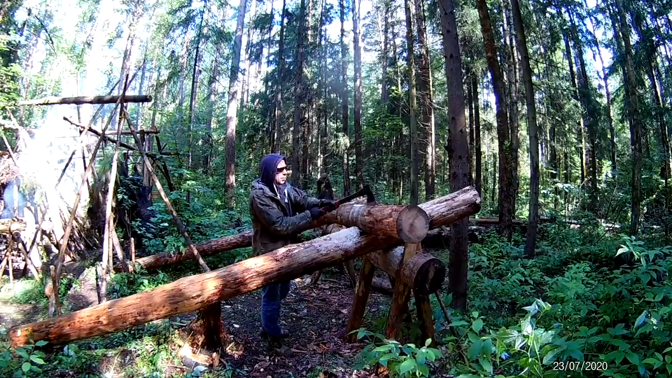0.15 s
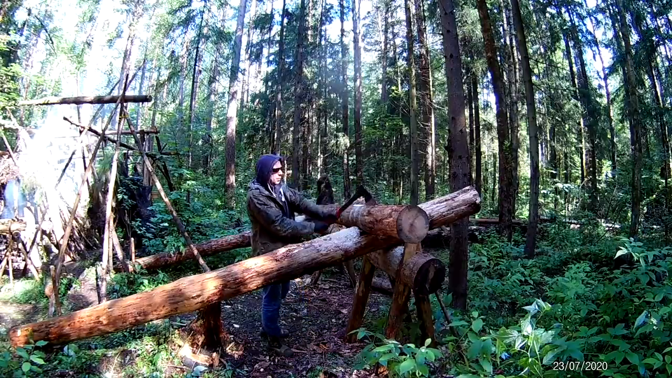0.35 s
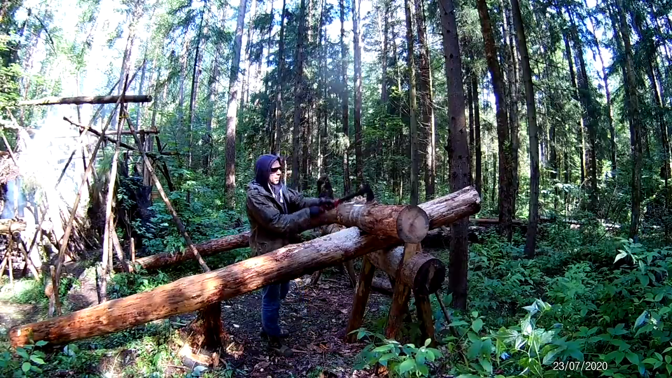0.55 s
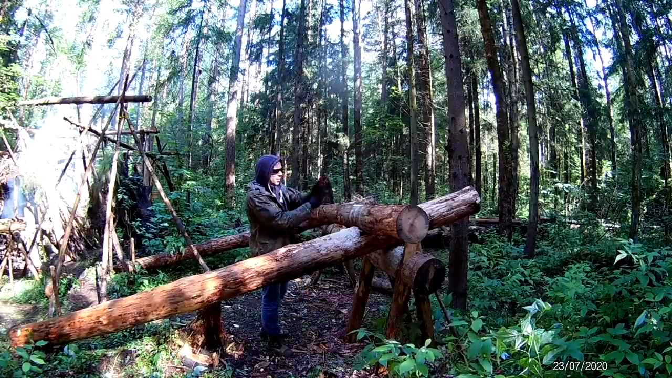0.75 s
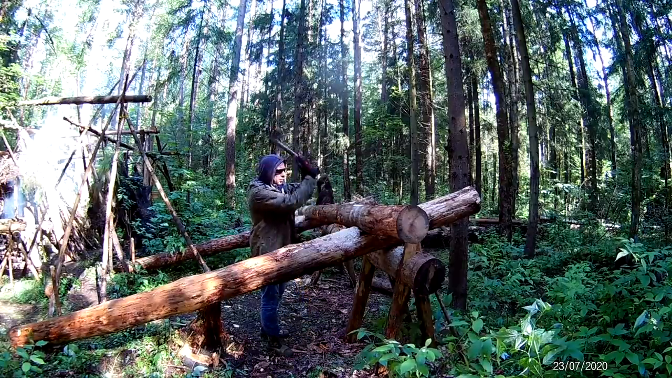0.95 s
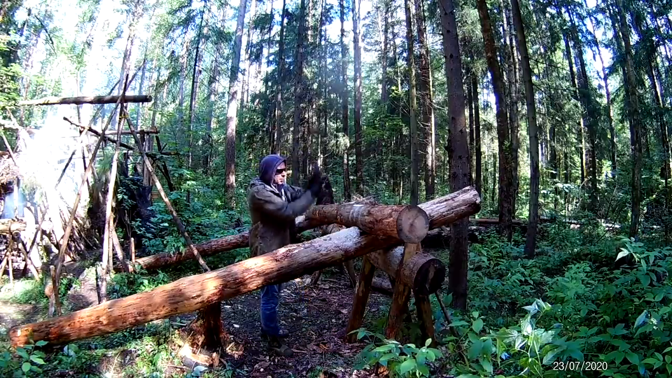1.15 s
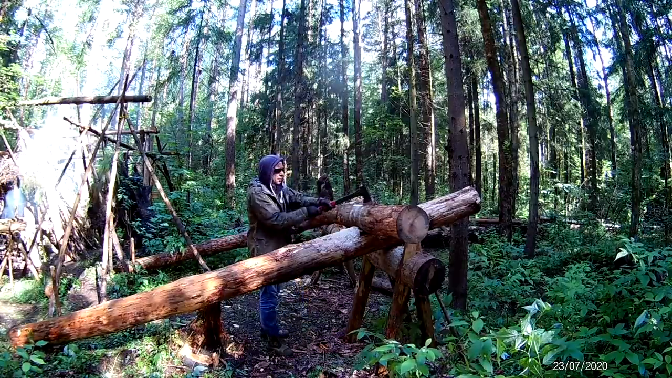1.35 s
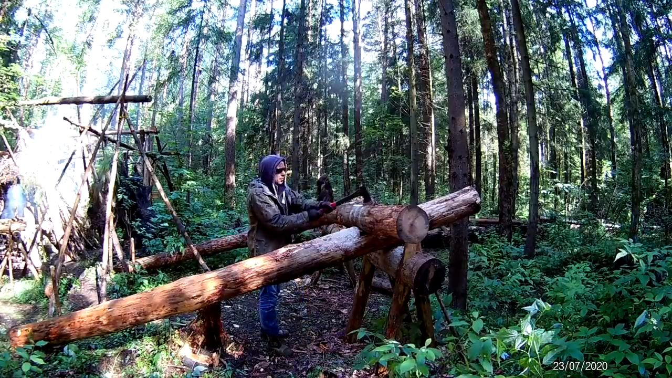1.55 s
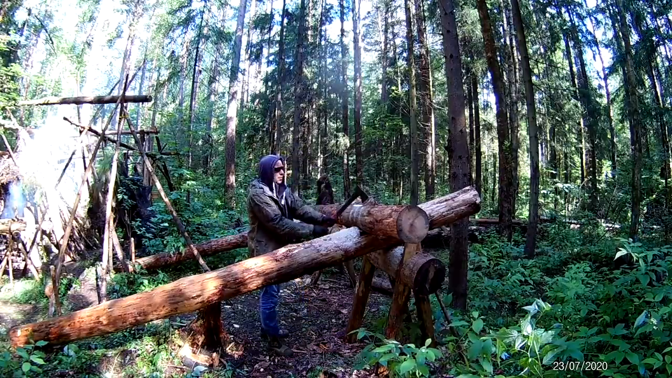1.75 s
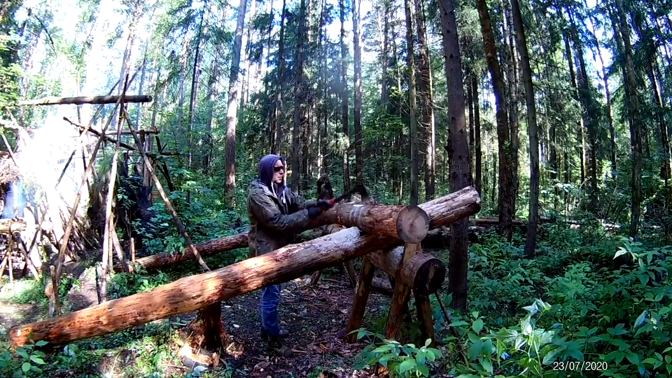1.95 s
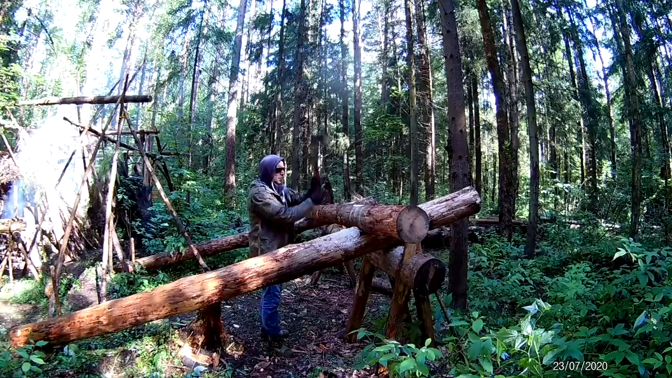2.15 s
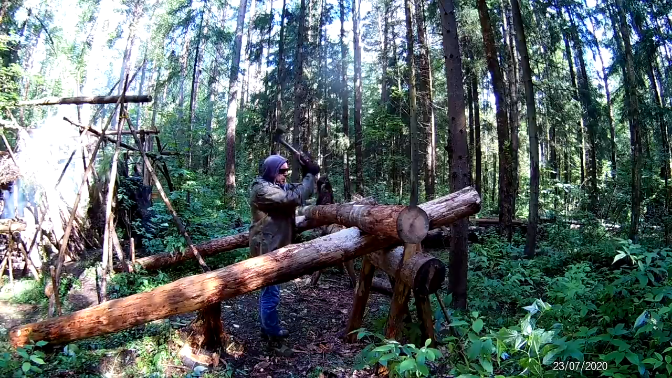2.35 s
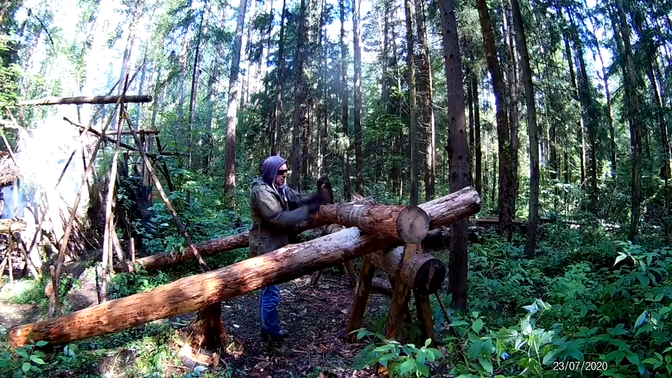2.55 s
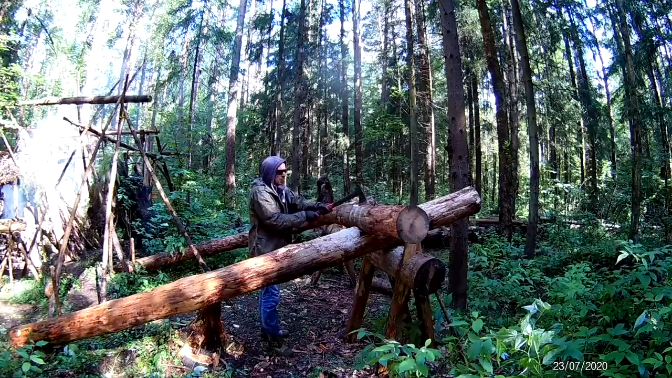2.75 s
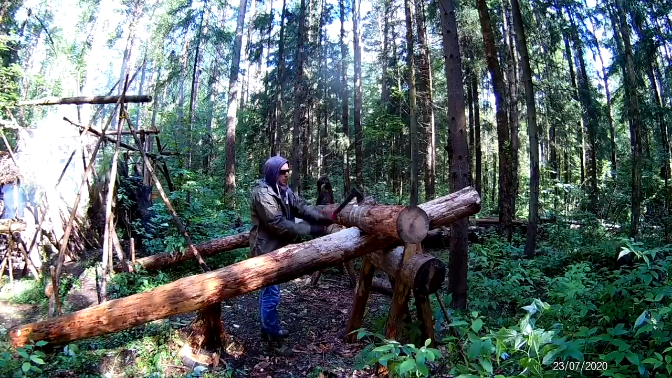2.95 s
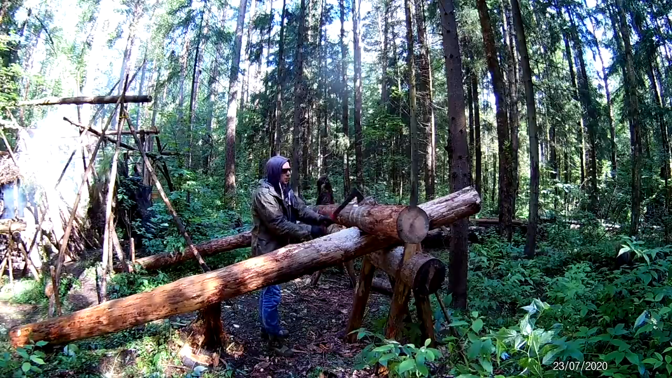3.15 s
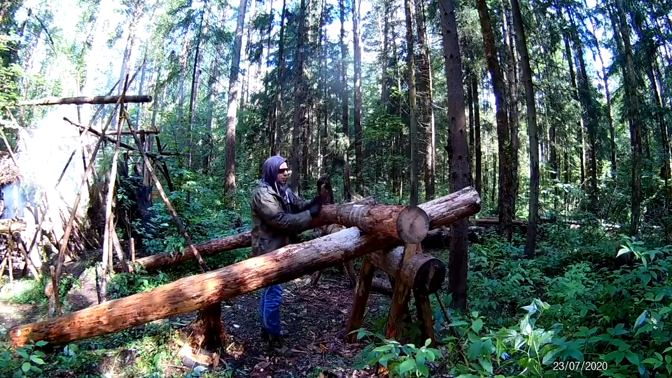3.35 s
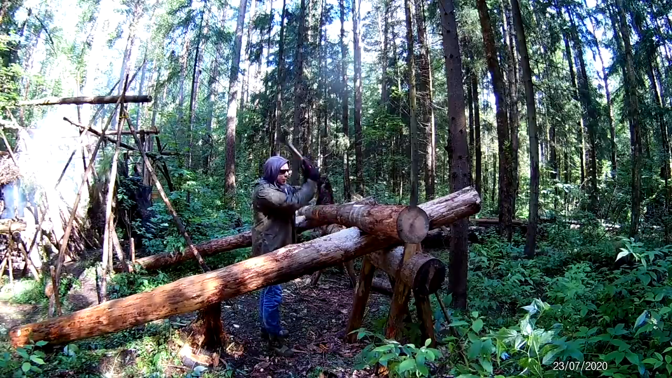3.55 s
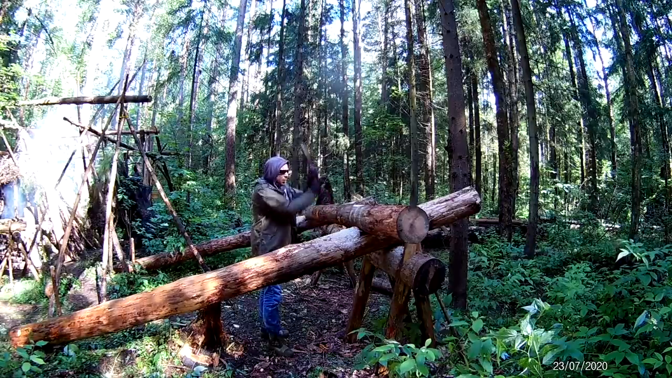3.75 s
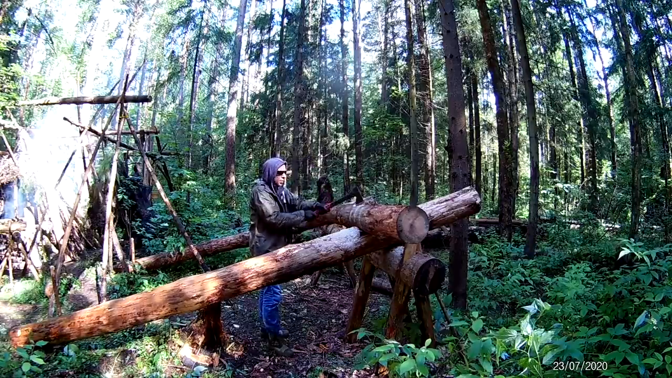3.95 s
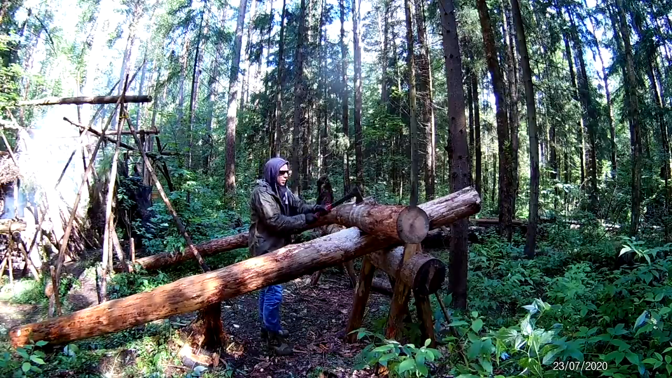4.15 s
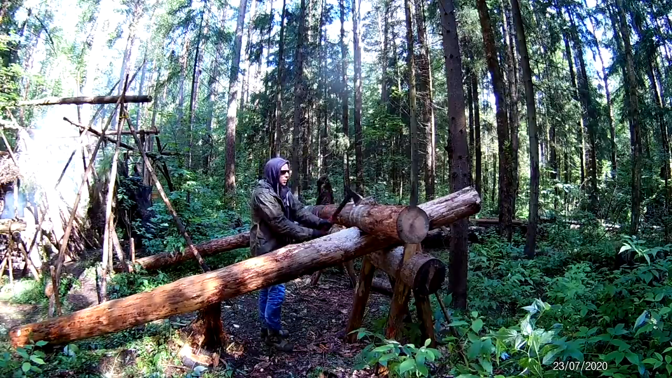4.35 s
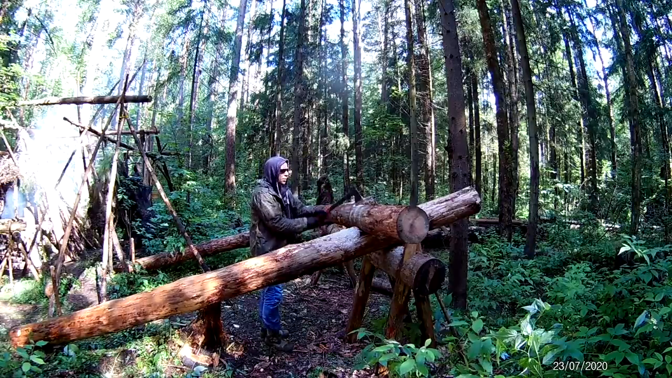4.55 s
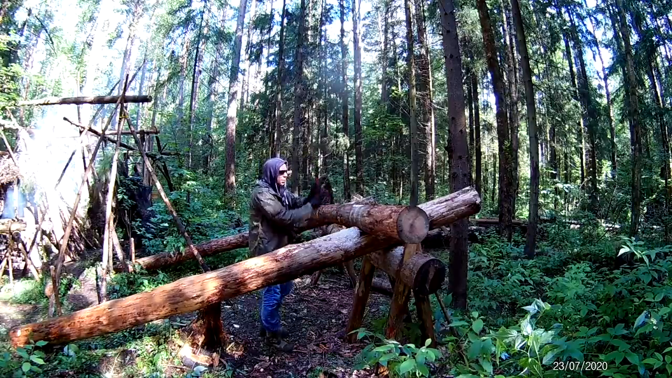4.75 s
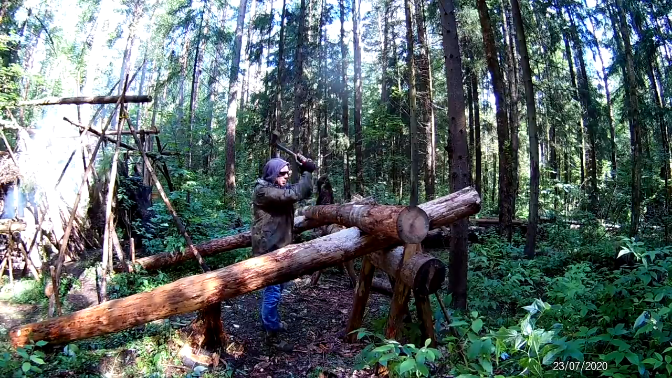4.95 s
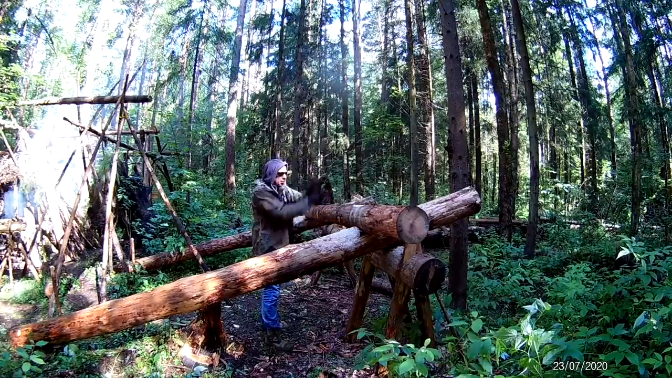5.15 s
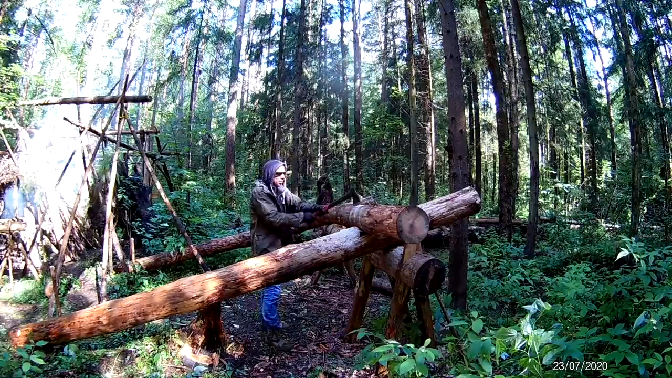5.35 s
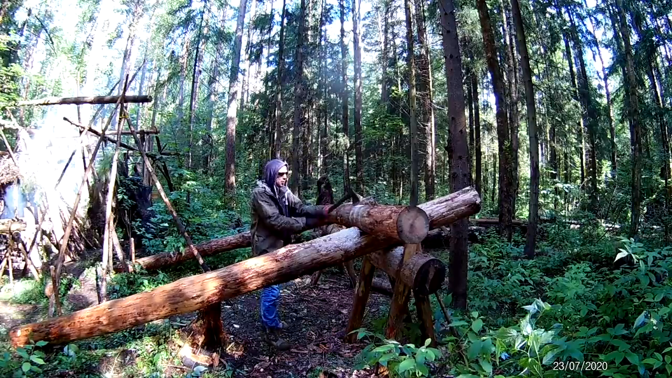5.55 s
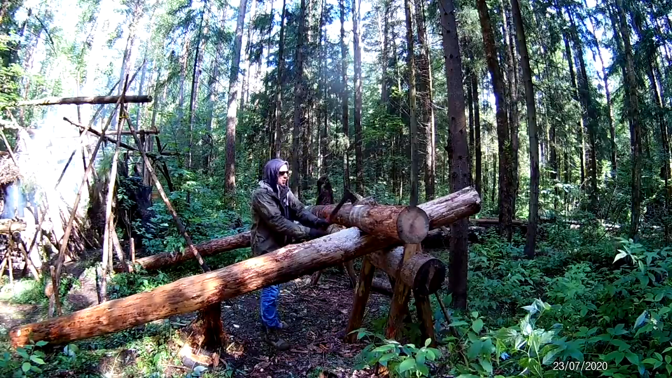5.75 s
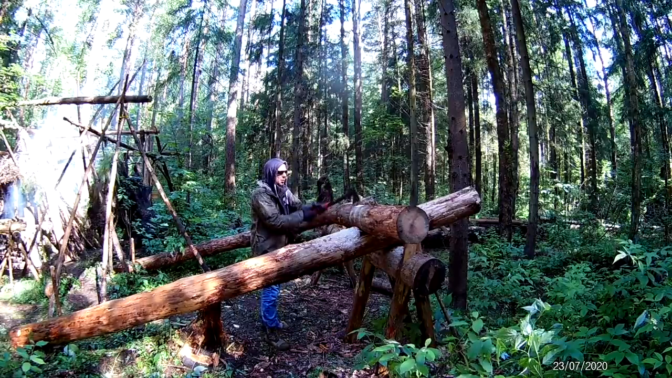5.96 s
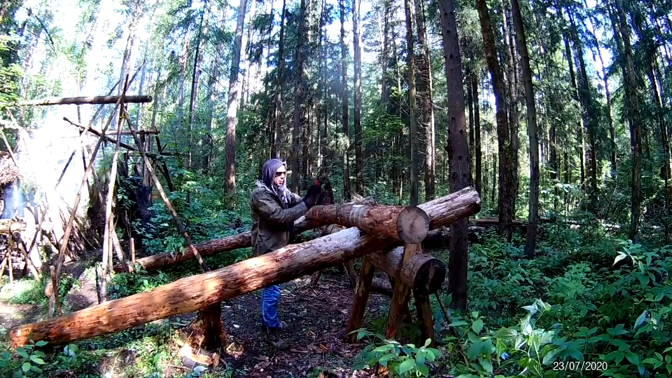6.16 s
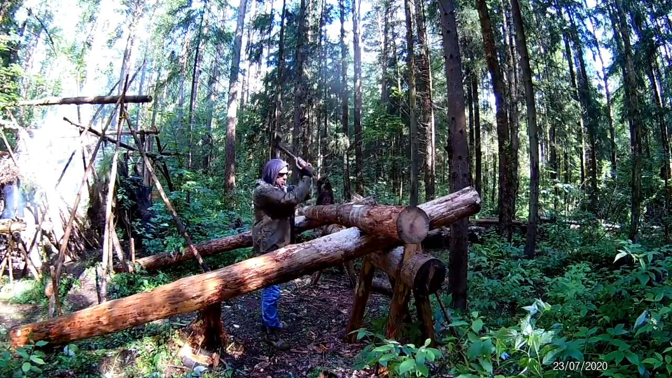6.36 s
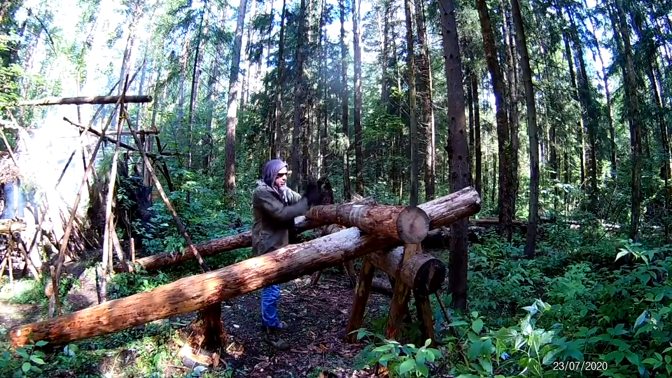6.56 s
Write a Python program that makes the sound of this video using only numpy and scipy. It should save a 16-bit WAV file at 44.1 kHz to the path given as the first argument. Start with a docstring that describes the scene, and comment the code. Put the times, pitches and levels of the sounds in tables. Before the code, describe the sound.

An axe bites into a long log right at the start, then again at about 1.4, 2.7, 4.0 and 5.4 seconds, some metres from the microphone in a quiet forest. Each blow is a sharp crack of tearing fibres with a short, hollow wooden ring and a slight low thump. The trunks scatter it into an echo that fades until the next blow. A small bird gives faint, very short, high chirps, in loose runs from about 0.7 to 2.5 seconds and 4 to 5.6 seconds, with two more near 6.5 seconds. Chips of wood drop now and then with tiny clicks. Underneath lie a soft hush of distant trees, faint hiss and a low wind rumble on the microphone, swelling slightly near 3.8 seconds. A barely audible thin whine dies away after the first second.

```python
"""An axe bites into a long log on trestles in a spruce forest, some metres from a small camera.
Fibres tear, the log rings, the ground thumps, and the trunks scatter the blow into a long echo.
Behind it are wind on the microphone, the far hush of the trees, a hiss and a thin whine that soon dies.
A small bird starts to chirp, then bits of wood drop now and then. Four more blows follow,
about 1.3 seconds apart, and the bird chirps on after the last one."""
import sys
import numpy as np
from scipy import signal
from scipy.fft import rfft, irfft
from scipy.io import wavfile
from scipy.ndimage import uniform_filter1d

SR = 44100
rng = np.random.default_rng(int(sys.argv[2]) if len(sys.argv) > 2 else 0)


def to_wav(sig):
    """Store sig (one row per channel, or 1-D mono) as 16-bit WAV at the path in sys.argv[1].

    Samples outside -1..1 are clipped; the rate is SR.
    """
    pcm = np.clip(np.atleast_2d(sig), -1, 1) * 32767
    pcm = np.round(pcm).astype(np.int16)
    wavfile.write(sys.argv[1], SR, pcm.T)  # frames by channels


N = 291501
LEAD = 2048  # spare samples before time zero, where the first blow begins


def undb(db):
    """Turn decibels (dB) into a number to multiply by."""
    return 10 ** (np.asarray(db) / 20)


def level(x, db):
    """Set a sound's average level."""
    return x * undb(db) / np.sqrt(np.mean(x ** 2))


def colour(x, spectrum):
    """Turn pitches up or down along (Hz, dB) points, with a filter that never sounds early."""
    hz, db = np.transpose(spectrum)
    grid = np.maximum(np.fft.rfftfreq(8192, 1 / SR), 1)
    gain = undb(np.interp(np.log(grid), np.log(hz), db))
    cepstrum = irfft(np.log(gain))
    cepstrum[1:4096] *= 2
    cepstrum[4097:] = 0
    return signal.fftconvolve(x, irfft(np.exp(rfft(cepstrum))))[:len(x)]


def fade(t, fade_s):
    """Die away. A fade time is how long a sound takes to drop 60 dB."""
    return np.exp(-np.log(1000) * t / fade_s)


def add(track, s, sound):
    """Mix a sound in at s seconds; tracks begin LEAD samples early."""
    i = int(round(s * SR)) + LEAD
    track[i:i + len(sound)] += sound[:len(track) - i]


def wander(per_second):
    """A smooth random curve that strays about 1 either side of zero."""
    k = int(SR / per_second)
    steps = np.repeat(rng.standard_normal(N // k + 1), k)
    slow = uniform_filter1d(uniform_filter1d(steps, k), k)[:N]
    return slow / slow.std()


def tilt_and_bump(hz, tilt_db, bump_db, pivot_hz, bump_hz, octaves):
    """A change of tone in dB: a slope from low to high, plus a bump around one pitch."""
    bump = np.exp(-.5 * (np.log2(hz / bump_hz) / octaves) ** 2)
    return tilt_db * np.log2(hz / pivot_hz) + bump_db * bump


# The blade touches and wedges in, then the log knocks twice on its trestles.
# Each row: seconds after the touch, strength in dB.
KNOCKS = [(.0001, -19.4), (.0028, 0), (.00851, 3.9), (.01415, -6.9)]
# The tone of tearing fibres, shaped by the wood around the cut. Each row: pitch in Hz, level in dB.
FIBRE_TONE = [(200, -38.5), (550, -4.5), (700, -5), (950, -0.5), (1250, -6), (1420, -8), (1620, -4.5),
              (1950, -12.5), (2500, -18.5), (4500, -23.5), (6500, -41), (9000, -47.5), (15000, -66)]
# The tone of the steel edge. Each row: pitch in Hz, level in dB.
EDGE_TONE = [(1000, -12), (3600, 5.5), (6000, -15), (9000, -23), (12500, -15), (13400, -38),
             (15500, -45.5)]
# The ground and a near trunk throw the edge's snap back. Each row: delay in seconds, level in dB.
ECHOES = [(.0100, -3.5), (.0330, -12.5)]
# Moss and bark soak up the treble of those echoes. Each row: pitch in Hz, change in dB.
MOSS_TONE = [(5000, -1.5), (9000, -10)]


def crack(crack_db, tilt_db, notch_db):
    """Fibres part in many uneven snaps, renewed at each knock, under the bright snap of the edge."""
    t = np.arange(SR // 4) / SR
    noise = rng.standard_normal((2, len(t)))
    fibre_snaps, edge_snaps = noise * undb([[2.0], [4.5]] * rng.exponential(size=noise.shape))
    tearing = (1 - np.exp(-t / 0.0037)) * fade(t, 0.083)
    for s, knock_db in KNOCKS:
        tearing += 0.069 * undb(knock_db) * (t > s) * fade(np.abs(t - s), 0.032)
    fibres = level(colour(tearing * fibre_snaps, FIBRE_TONE), -34.5)
    bite = (1 - np.exp(-t / 0.0004)) * fade(t, 0.03)
    edge = level(colour(bite * edge_snaps, EDGE_TONE), -51)
    echoes = sum(undb(db) * np.interp(t - s, t, edge, left=0) for s, db in ECHOES)
    # the notch in the wood shapes the tone of each crack
    hz = np.geomspace(600, 4500, 24)
    tone_db = crack_db + tilt_and_bump(hz, tilt_db, notch_db, pivot_hz=1390, bump_hz=1810, octaves=0.17)
    return colour(fibres + edge + colour(echoes, MOSS_TONE), list(zip(hz, tone_db)))


# The notes of the bending log. Each row: pitch in Hz, level in dB, fade time in seconds,
# which way the wood swings first (+1 or -1).
LOG_NOTES = [(117.5, -17.8, 0.265, -1), (195.2, -29.5, 0.244, 1), (214.8, -9.7, 0.059, -1),
             (294.7, -9.6, 0.115, 1), (309.3, -25.1, 0.291, 1), (324.9, -38, 0.5, -1),
             (419.4, -7.1, 0.04, 1), (445.9, -8.4, 0.3, -1), (523.0, -38.6, 0.187, -1),
             (546.3, -34.1, 0.171, -1), (560.3, -29.3, 0.127, -1), (630.5, -12.3, 0.04, -1),
             (683.0, -34.6, 0.195, 1), (782.4, -21.5, 0.214, 1), (827.8, -48.2, 0.622, 1),
             (865.7, -51.3, 0.281, 1), (925.8, -32.1, 0.103, -1), (1015.2, -30.3, 0.073, 1),
             (1134.6, -45.2, 0.347, -1)]


def log_ring(length, ring_db, tilt_db, spot_db):
    """Each knock sets all the log's notes ringing; the high ones vary most from blow to blow."""
    hz, db, fade_s, side = np.transpose(LOG_NOTES)[:, :, None]
    # the spot where the axe lands favours or mutes some notes
    tone_db = tilt_and_bump(hz, tilt_db, spot_db, pivot_hz=355, bump_hz=556, octaves=0.074)
    chance_db = 2.5 * hz / 1000 * rng.standard_normal(hz.shape)
    gain = np.sign(side) * undb(db + ring_db + tone_db + chance_db)
    out = 0
    for s, knock_db in KNOCKS:
        t = np.maximum(np.arange(SR // 2) / SR - s, 0)
        notes = gain * np.sin(2 * np.pi * hz * t) * fade(t, length * fade_s)
        swell = 1 - np.exp(-t / .00183)
        out = out + undb(knock_db) * notes.sum(axis=0) * swell
    return out


# The deep tone of both the thump and the wind. Each row: pitch in Hz, level in dB.
RUMBLE_TONE = [(12, -5), (28, 0), (55, -3), (85, -6), (115, -17), (200, -54.5)]


def ground_thump():
    """The trestles send a short, low rumble through the ground."""
    t = np.arange(SR // 2) / SR
    rumble = level(colour(rng.standard_normal(len(t)), RUMBLE_TONE), -46)
    return rumble * fade(t, 0.8) * (1 - np.exp(-t / .005))


# Sound scattered by the trunks. Each row: middle pitch of an octave in Hz, near level in dB,
# near fade time in seconds, far level in dB, far fade time in seconds.
TRUNK_BANDS = [(122.7, -57, 0.32, -72.5, 0.63), (281, -44, 0.44, -72, 3.5), (525, -36, 0.28, -58.5, 2.74),
               (993, -38.5, 0.36, -50, 1.47), (2010, -36, 0.34, -50, 1.17),
               (3730, -40.5, 0.13, -46.5, 0.97), (5600, -40, 0.36, -42, 1.1),
               (10500, -46.5, .12, -49.5, .4)]
# The log's lasting notes carry furthest. Each row: pitch in Hz, change in dB.
FAR_TONE = [(260, -9.5), (322, 4.5), (372, -7), (428, 3), (480, -7.5), (600, 1), (685, -1), (742, -6),
            (795, 11), (880, -7), (1150, 6.5), (1450, -0.5), (1700, 5), (2000, -3.5)]


def forest_echo(sound):
    """Near trunks give a quick echo; those beyond the clearing give a slow one."""
    t = np.arange(2 * SR) / SR
    near = far = 0
    for hz, near_db, near_s, far_db, far_s in TRUNK_BANDS:
        band = signal.butter(2, [hz / np.sqrt(2), hz * np.sqrt(2)], "band", fs=SR, output="sos")
        noise = signal.sosfilt(band, rng.standard_normal((2, len(t))))
        near = near + undb(near_db) * fade(t, near_s) * noise[0]
        far = far + undb(far_db) * fade(t, far_s) * noise[1]
    far_swell = 0.5 + 0.2 * (1 - np.exp(-(t / 0.2) ** 4))
    echo = (near + far_swell * colour(far, FAR_TONE)) * (1 - np.exp(-t / 0.014))
    return signal.fftconvolve(sound, echo)[:len(sound)]


# The rise and fall of the wind. Each row: time in seconds, level in dB.
GUSTS = [(0, -60), (.45, -66.5), (.75, -61), (1.25, -64), (2.5, -62.5), (2.9, -60.5), (3.35, -65),
         (3.8, -56.5), (4.3, -61.5), (5.2, -65), (6.2, -63.5), (6.61, -61)]


def wind(t):
    """Gusts rumble unevenly on the microphone."""
    rumble = level(colour(rng.standard_normal(N), RUMBLE_TONE), 0)
    gust_db = np.interp(t, *np.transpose(GUSTS))
    return rumble * undb(gust_db + 1.6 * wander(per_second=8.9))


# The tone of the distant trees. Each row: pitch in Hz, level in dB.
HUSH_TONE = [(70, -10.5), (125, -2.5), (210, -1.5), (320, -0.5), (500, -0.5), (800, -3.5), (1050, -7),
             (1300, -13.5), (2000, -18.5), (3200, -31), (6000, -42)]


def forest_hush():
    """The far forest makes a soft noise whose level gently sways."""
    hush = level(colour(rng.standard_normal(N), HUSH_TONE), -61)
    return hush * undb(0.52 * wander(per_second=3.1))


# The tone of the hiss. Each row: pitch in Hz, level in dB.
HISS_TONE = [(500, -5.5), (3200, 1.5), (5000, -0.5), (8000, -6), (11000, -6.5), (15500, -3.5)]


def microphone_hiss():
    """The microphone adds a faint, steady noise of its own."""
    return level(colour(rng.standard_normal(N), HISS_TONE), -76.5)


def whine(t, hz=2120, dies_from_s=.98):
    """One thin note gets slowly quieter, then dies away."""
    db = -75 - 5 * t - 48.5 * np.maximum(t - dies_from_s, 0)
    return np.sqrt(2) * undb(db) * np.sin(2 * np.pi * hz * t)


# The bird's calls. Each row: time in seconds, strength in dB, rough top pitch in Hz.
CHIRPS = [(0.118, -63, 5490), (0.697, -63, 5380), (0.842, -62, 5400), (0.959, -60, 5540),
          (1.078, -59, 5560), (1.1618, -59.5, 5570), (1.2471, -59, 5460), (1.5913, -59, 5360),
          (1.9779, -61, 5120), (2.1625, -63, 5410), (2.2498, -62, 5420), (2.3436, -61.5, 5420),
          (2.416, -62, 5550), (2.4977, -62.5, 5430), (3.9674, -61.5, 5400), (4.114, -61, 5300),
          (4.245, -62, 5650), (4.676, -61, 5570), (4.8439, -62, 5630), (4.9395, -59.5, 5700),
          (5.015, -58.5, 5550), (5.0918, -59.5, 5570), (5.167, -58.5, 5540), (5.2348, -59, 5530),
          (5.3023, -60, 5480), (5.435, -61, 5640), (5.4998, -59, 5580), (5.5702, -59.5, 5600),
          (6.405, -59, 5300), (6.544, -59.5, 5380)]


def bird(chirp_s=.021, top_s=.008):
    """Short, wavering whistles arch up and down in pitch and level, blurred by nearby leaves."""
    out = np.zeros(N + LEAD)
    t = np.arange(int(chirp_s * SR)) / SR
    before_top = np.maximum(1 - t / top_s, 0)
    after_top = np.maximum(t - top_s, 0) / (chirp_s - top_s)
    pitch_arch = 1.02 - .25 * before_top ** 2 - .25 * after_top ** 3
    arch_db = -4.5 - 1.5 * before_top - 7.5 * after_top
    for s, db, hz in CHIRPS:
        waver = 1 + .22 * uniform_filter1d(rng.standard_normal(len(t)), size=40)
        phase = 2 * np.pi * np.cumsum(hz * waver * pitch_arch) / SR
        add(out, s - .003, undb(db + arch_db) * np.sin(phase))
    tail = np.arange(SR // 8) / SR
    leaves = rng.standard_normal(len(tail)) * fade(tail, 0.15)
    return out + undb(-29) * signal.fftconvolve(out, leaves)[:len(out)]


# Wood chips and twigs that drop. Each row: time in seconds, level in dB, pitch in Hz.
DROPS = [(0.493, -49, 2120), (0.5394, -50, 2110), (1.1023, -48.5, 1640), (2.665, -45, 1630),
         (3.2568, -47, 1940), (3.6473, -46, 1900), (4.709, -48, 1530), (6.0462, -57.5, 1776)]


def falling_chips():
    """Each dry bit of wood lands with a tiny ringing click, then bounces once, more softly."""
    out = np.zeros(N + LEAD)
    t = np.arange(SR // 50) / SR
    for s, db, hz in DROPS:
        click = undb(db) * np.sin(2 * np.pi * hz * t) * fade(t, 0.0039)
        add(out, s + 0.0022, click)
        add(out, s + rng.uniform(0.0024, 0.0066), undb(-6) * click)
    return out


# The five axe blows. Each row: start in seconds, ring length (1 is normal), ring change in dB,
# ring tilt in dB per octave, landing spot's bump in dB, crack change in dB,
# crack tilt in dB per octave, notch's bump in dB.
BLOWS = [(-.0199, 1.07, -4, 3, 10, -4, 0, -2), (1.3509, 0.93, -1.2, 1, 5.5, 0, -4, -2),
         (2.6946, 0.9, 0.5, 1, -0.5, 2, -2, -2), (3.9984, 1.073, 1.04, 1.8, 0, -0.5, -0.8, 2),
         (5.3596, 0.99, 1, 0.3, 2.5, 0.5, -0.7, 1.5)]
# The camera's case: a small opening thins the deepest bass, and hollows swallow two narrow ranges.
# Each row: pitch in Hz, change in dB.
CASE_TONE = [(25, -15.5), (65, 3), (2400, -2.5), (2900, -19), (3400, -9), (6800, -4.5), (7900, -22),
             (8400, -2)]


def scene():
    """Play the blows, then mix in their echo, the bird, the chips and the background."""
    axe, ground = np.zeros((2, N + LEAD))
    for s, length, ring_db, ring_tilt_db, spot_db, crack_db, crack_tilt_db, notch_db in BLOWS:
        add(axe, s, log_ring(length, ring_db, ring_tilt_db, spot_db))
        add(axe, s, crack(crack_db, crack_tilt_db, notch_db))
        add(ground, s, ground_thump())
    echo = undb(-3.5) * forest_echo(axe)
    through_case = colour(axe + echo + bird() + falling_chips(), CASE_TONE)
    t = np.arange(N) / SR
    background = wind(t) + forest_hush() + microphone_hiss() + whine(t)
    return (through_case[LEAD:] + ground[LEAD:] + background)[None]


def record(dry, top_hz=15740):
    """The camera cuts off the highest treble."""
    return signal.sosfilt(signal.ellip(10, .2, 80, top_hz, fs=SR, output="sos"), dry)


dry = scene()
out = record(dry)
to_wav(out)
```